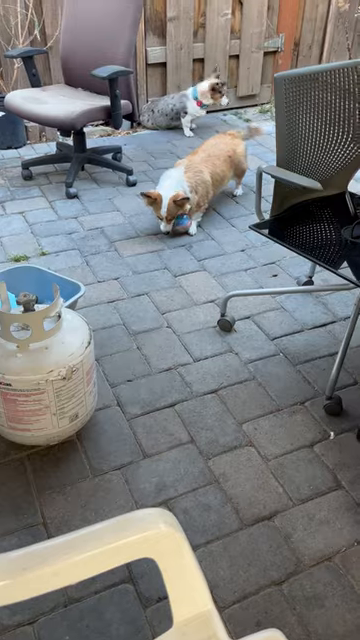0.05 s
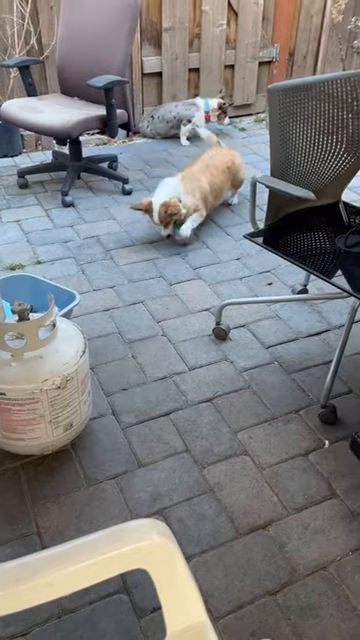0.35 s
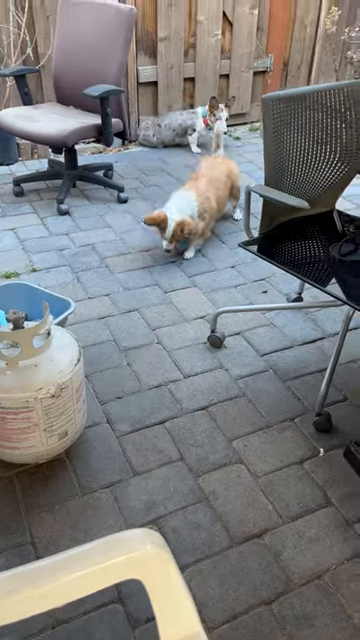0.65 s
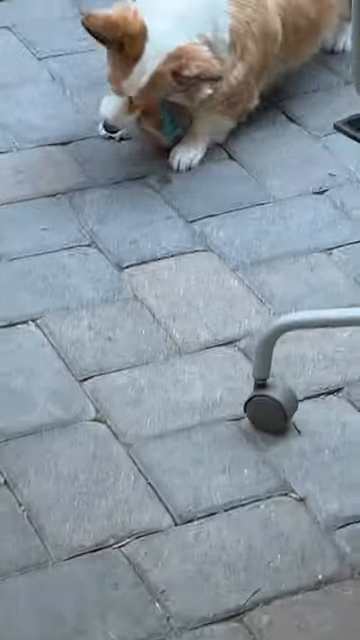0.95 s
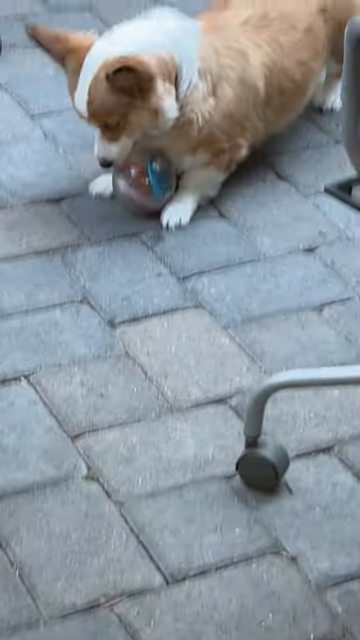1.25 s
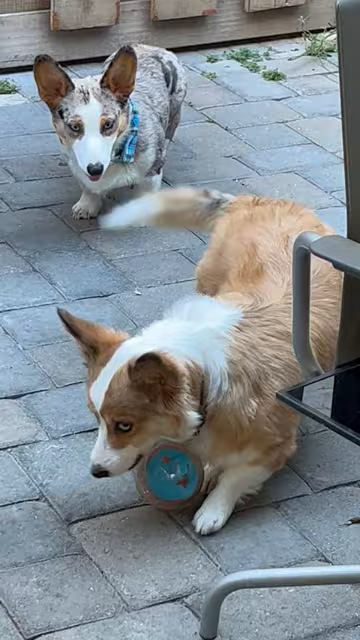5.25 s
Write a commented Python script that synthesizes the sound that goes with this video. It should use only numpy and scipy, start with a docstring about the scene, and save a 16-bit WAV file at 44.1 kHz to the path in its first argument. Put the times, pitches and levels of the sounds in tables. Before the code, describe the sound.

A dog plays with a hard hollow plastic ball on concrete pavers in a backyard, heard from nearby. In the first 0.6 seconds the ball knocks sharply and metal collar tags clink. From 0.7 to 2 seconds it is quieter, with only paws brushing the stone and claws ticking. Between 2.1 and 4.8 seconds the ball rolls, rattles and skids on grit in irregular pushes, with hollow knocks that are hardest around 2.4, 3.2 and 3.5 seconds. Lighter knocks and tag jingles follow from 5.4 to 6.6 seconds, then a soft, dull bump at 6.7. From 7.1 to 7.9 seconds a last shove brings scraping, hard knocks and more clinking tags. The sounds bounce briefly off the chairs, fence and house wall. A faint distant rumble, a wavering low hum and soft outdoor air continue throughout.

```python
"""A dog shoves a hard hollow plastic ball over concrete pavers; rumble, hum and outdoor air throughout.
0-0.6 s: the ball knocks (shell, enclosed air, contact crack) and metal collar tags clink.
0.7-2 s: paws brush the stone, claws tick. 2.1-4.8 s: the ball rolls, skids on grit and knocks hard.
5.4-6.6 s: lighter knocks and jingles. 6.7 s: a dull bump. 7.1-7.9 s: a last shove, hard knocks, tags.
Chairs, fence and house wall answer the dog and the ball briefly."""
import sys
import numpy as np
from scipy import signal
from scipy.fft import rfft, irfft, next_fast_len
from scipy.io import wavfile
from scipy.ndimage import uniform_filter1d, map_coordinates

SR = 44100
rng = np.random.default_rng(int(sys.argv[2]) if len(sys.argv) > 2 else 0)


def pcm_store(signal):
    """Save signal as 16-bit PCM."""
    levels = np.round(np.clip(np.atleast_2d(signal), -1, 1) * 32767)
    wavfile.write(sys.argv[1], SR, levels.astype(np.int16).T)


N = 349713
CLOCK_S = np.arange(N) / SR
EVENT_S = np.arange(SR // 2) / SR

# background (time [s], hum level [dB], air level [dB])
BACKGROUND_LEVELS = [(0, -61, -54.5), (1.8, -58.5, -56), (4.6, -48, -59), (6.101, -59.5, -53),
                     (7.93, -51, -53)]
# background spectra (frequency [Hz], relative density [dB])
RUMBLE_SPECTRUM = [(20, -34), (48, -4), (110, -1), (150, -8), (260, -8.5), (400, -64)]
AIR_SPECTRUM = [(120, -12.5), (230, -0.5), (400, -3), (700, -8.5), (1500, -13), (3000, -26), (6000, -37.5),
                (10000, -53.5)]
# fence and wall decay (frequency [Hz], t60 [s])
FENCE_DECAY = [(150, 0.88), (400, 0.18), (1000, 0.3), (3000, 0.11), (7000, 0.1), (15000, 0.27)]
# diffuse width (frequency [Hz], side gain [ratio])
DIFFUSE_WIDTH = [(60, .06), (130, .06), (250, .13), (550, .6), (1200, 1), (1600, .6), (2100, .3),
                 (3800, .28), (5200, .55), (12000, .65)]
# left over right (frequency [Hz], phase lead [rad])
LEFT_LEAD = [(500, 0), (1120, -.3), (1350, -1.1), (1640, 0), (4600, 0), (5400, -1.1), (9000, -1.25),
             (15000, -1.6)]
# left over right (frequency [Hz], gain [dB])
LEFT_GAIN = [(100, .2), (300, 1.3), (600, 3.3), (1100, 0)]

# contact spectra (frequency [Hz], relative density [dB])
PAW_SPECTRUM = [(1500, 0), (3500, -6.5), (7000, -1), (10000, -8.5), (13000, -5.5), (16000, -11)]
CLAW_SPECTRUM = [(800, -18), (2500, -19.5), (4800, 8), (6500, 12), (9000, 2), (12000, -36.5)]
COLLAR_SPECTRUM = [(1100, -26), (1800, -9), (2800, -19), (4100, -5), (4550, 0), (4950, -3), (6300, -6.5),
                   (11000, -40)]
GRIT_SPECTRUM = [(600, -31), (1500, 15.5), (2600, 5.5), (4800, 6.5), (7000, 5), (10000, -5.5), (13000, -9),
                 (16000, -20)]
THOCK_SPECTRUM = [(100, -38.5), (220, 8), (480, 9.5), (1150, 4.5), (1700, -2.5), (3000, -21.5), (6000, -43),
                  (11000, -68.5)]
SNAP_SPECTRUM = [(600, -13), (1400, -5), (2000, -3.5), (3000, -5.5), (4200, -13.5), (8000, -35)]
CRACK_SPECTRUM = [(1500, -19), (3200, -7.5), (4600, 2.5), (6400, 1), (8200, -5.5), (11000, -33.5)]
SIZZLE_SPECTRUM = [(5000, -32.5), (8500, 0.5), (10000, -3.5), (12500, 1.5), (15500, -8)]
# modes of tag, enclosed air and shell (frequency [Hz], relative level [dB], t60 [s])
LARGE_TAG_MODES = [(4250, -11, .18), (4520, 0, .24), (4620, -4, .2), (4800, -9, .18), (5630, -13, .16)]
CAVITY_MODES = [(292, -11, 0.06), (342, -3, 0.075), (410, -12, 0.04)]
LOW_SHELL_MODES = [(455, 0, .085), (532, 1, .085), (638, -1, .05), (795, -4, .07), (920, -3, .07),
                   (1060, -1, .065), (1270, -4, .09)]
STIFF_SHELL_MODES = [(1300, -2.5, .09), (1640, -2, .06), (1954, -1.5, .04), (2300, -2, .045),
                     (2785, -3, .055), (3400, -4, .04)]

# paws and claws on stone (time [s], level [dB])
PAW_SCUFFS = [(0.298, -55), (0.768, -52), (1.018, -57), (1.385, -57), (1.574, -54), (1.869, -53.5),
              (2.992, -43.5), (3.178, -41), (4.006, -51), (5.069, -61.5), (5.96, -48.5), (6.375, -56),
              (7.24, -36), (7.664, -46.5)]
CLAW_TICKS = [(0.8156, -48), (1.8295, -54.5), (2.1919, -46), (3.0, -32), (3.289, -48), (3.6245, -43.5),
              (4.3556, -46), (5.788, -31), (6.495, -56), (7.0887, -51), (7.265, -35.5), (7.6976, -45.5)]
# collar parts collide (time [s], strength [dB], favoured pitch [Hz])
COLLAR_JINGLES = [(0.382, -23.5, 4500), (0.463, -33.5, 4560), (0.5, -31, 4500), (0.574, -41.5, 4420),
                  (0.612, -37, 5360), (2.826, -44, 4000), (3.901, -43, 5360), (3.965, -48, 5100),
                  (4.293, -45, 5400), (4.399, -46, 4000), (5.681, -45, 4530), (5.919, -35, 5570),
                  (6.129, -38, 4270), (6.159, -37, 5440), (6.335, -44, 4000), (6.433, -46, 5500),
                  (6.547, -34.5, 5660), (7.224, -37, 4600), (7.267, -26, 4700), (7.701, -36, 4800)]
# large tag struck full on (time [s], level [dB])
TAG_CLINKS = [(0.384, -27.5), (0.4, -28), (0.454, -46)]
# thin tag (time [s], pitch [Hz], level [dB])
TAG_PINGS = [(2.422, 11600, -47), (7.528, 11860, -27), (7.529, 15150, -35), (7.75, 10400, -43)]
# dog pushes ball (peak time [s], swell [s], ebb [s], strength [dB], slip [0 roll, 1 skid], cavity [dB])
BALL_PUSHES = [(0.059, 0.052, 0.089, -43, 0.38, -42), (0.482, .11, .055, -33, 0.79, -39),
               (2.21, 0.157, 0.12, -56.5, 0.9, -47), (2.508, 0.06, 0.18, -47.5, 0.64, -38),
               (2.763, 0.051, .05, -51, 0.43, -38.5), (2.882, 0.055, 0.1, -46, 0.68, -39.5),
               (3.151, 0.08, 0.16, -41, 0.77, -35), (3.24, .05, .04, -49.5, 0.77, -49),
               (3.64, 0.25, 0.1, -42.5, 0.82, -46), (4.43, 0.068, 0.13, -53.5, 0.76, -45.5),
               (4.525, 0.21, 0.16, -42.5, 0.73, -39.5), (5.787, 0.056, 0.18, -47, 0.72, -40.5),
               (6.07, 0.039, 0.115, -39, 0.073, -40.5), (6.385, 0.078, 0.1, -54, 0.81, -63),
               (7.14, 0.083, 0.11, -49.5, 0.43, -59), (7.3, 0.15, 0.19, -37, 0.67, -40.5),
               (7.491, 0.044, 0.088, -36, 0.41, -38), (7.681, 0.092, 0.14, -56, 0.91, -60)]
# ball hits pavers (time [s], strength [dB], hardness [0-1], favoured pitch [Hz], cavity [dB])
BALL_KNOCKS = [(.029, -31.5, 0.1, 1060, -48), (0.3815, -9, 0.8, 1280, -18), (.468, -25, .3, 1080, -42),
               (.493, -28, 0.5, 1200, -28.5), (.514, -33.5, .3, 550, -43), (0.61, -37, 0.55, 1820, -41.5),
               (2.148, -33, 0.15, 1023, -38.5), (2.4212, -14.5, 0.45, 1090, -34),
               (2.597, -29.5, 0.77, 1150, -58), (2.613, -22, 0.5, 1150, -36),
               (2.849, -24.5, 0.5, 406, -36.5), (3.0, -32, 0.8, 1560, -39), (3.059, -24, .15, 477, -33),
               (3.07, -20, 0.72, 1660, -31.5), (3.1874, -14.5, 0.84, 1440, -24.5),
               (3.229, -30, 0.5, 5600, -31.5), (3.343, -32, .6, 1100, -42.5), (3.471, -25, 0.2, 300, -33),
               (3.514, -11.5, 0.83, 4600, -25), (3.527, -13, 0.92, 597, -22.5),
               (3.74, -33, 0.3, 684, -33.5), (3.83, -33.5, 0.2, 526, -48), (4.185, -33, 0.3, 340, -32.5),
               (4.511, -26, 0.68, 1100, -33), (4.815, -20, 0.48, 880, -29.5), (5.446, -22, .15, 600, -34),
               (5.555, -35.5, 0, 558, -42), (5.692, -23, 0.1, 680, -32), (5.792, -26.5, 0.08, 550, -36),
               (5.86, -25, 0.6, 1500, -49), (5.991, -23, 0.7, 1660, -36.5), (6.021, -18, 0, 520, -38),
               (6.904, -31, 0.24, 950, -43), (7.266, -25.5, 0.8, 4730, -31), (7.344, -22.5, .2, 560, -38),
               (7.405, -21.5, 0.6, 1920, -36.5), (7.432, -9.5, 0.58, 1230, -33),
               (7.525, -17.5, 0.86, 1120, -38), (7.732, -20, .6, 716, -31), (7.851, -15, 0.79, 1950, -31)]

# layer laws (gain at full hardness or slip [dB], loss at zero [dB])
CLACK_LAW_DB, CRACK_LAW_DB, SIZZLE_LAW_DB = (-6, 25), (-5, 30.3), (-7.5, 40.2)
RATTLE_LAW_DB, GRIT_LAW_DB = (3.5, 4.9), (8.6, 34)
RUMBLE_DB, CHAIRS_DB, FENCE_DB = -51, -13, -9.5
BUMP_TIME_S, BUMP_HALF_WIDTH_S, BUMP_DB = 6.7, 0.066, -44.5
TOP_HZ = 16000


def amp(db):
    """Decibels to gain."""
    return 10 ** (np.asarray(db) / 20)


def unit(x):
    """Scale to rms 1."""
    return x / np.sqrt(np.mean(x ** 2) + 1e-20)


def unit_onset(x):
    """Scale to rms 1 over the first 10 ms."""
    return x / np.sqrt(np.mean(x[:SR // 100] ** 2) + 1e-20)


def decay(t60_s, time_s=EVENT_S):
    """Exponential decay."""
    return np.exp(-np.log(1000) * time_s / t60_s)


def curve_at(points, hz):
    """Interpolate on a log frequency axis."""
    knots_hz, values = np.transpose(points)
    return np.interp(np.log(hz + 1), np.log(knots_hz), values)


def wobble(rate_hz, time_s=CLOCK_S):
    """Smooth random curve."""
    knots = rng.standard_normal(int(time_s[-1] * rate_hz) + 4)
    return map_coordinates(knots, [time_s * rate_hz])


def filtered(x, response):
    """Apply a frequency response."""
    size = next_fast_len(N + SR // 2)
    return irfft(rfft(x, size) * response(np.fft.rfftfreq(size, 1 / SR)), size)[..., :N]


def noise(spectrum):
    """Coloured noise, rms 1."""
    return unit(filtered(rng.standard_normal(N), lambda hz: amp(curve_at(spectrum, hz))))


def min_phase(spectrum, size=1024):
    """Minimum-phase impulse response."""
    gain = amp(curve_at(spectrum, np.fft.rfftfreq(size, 1 / SR)))
    cepstrum = irfft(np.log(gain))
    cepstrum[1:size // 2] *= 2
    cepstrum[size // 2 + 1:] = 0
    return irfft(np.exp(rfft(cepstrum)))


def add(track, at_s, sound):
    """Mix in place."""
    part = track[max(round(at_s * SR), 0):][:len(sound)]
    part += sound[:len(part)]


def diffuse(mid, side):
    """Stereo from all around; bass nearly mono."""
    side = filtered(side, lambda hz: curve_at(DIFFUSE_WIDTH, hz))
    return np.array([mid + side, mid - side])


def layer_gain(law_db, control):
    """Gain falling as control goes from 1 to 0."""
    top_db, loss_db = law_db
    return amp(top_db - loss_db * (1 - control))


def ring(modes, scatter_db, detune, attack_s):
    """Damped modes; level and pitch vary with the contact point."""
    hz, db, t60_s = np.transpose(modes)[:, :, None]
    size, shift, phase = rng.standard_normal((3, len(modes), 1))
    waves = np.sin(2 * np.pi * (hz * (1 + detune * shift) * EVENT_S + phase)) * decay(t60_s)
    onset = 1 - np.exp(-EVENT_S / attack_s)
    return unit_onset((amp(db + scatter_db * size) * waves).sum(0) * onset)


def burst(colour_ir, snap_t60_s, chatter_db, chatter_t60_s):
    """Sharp contact, then uneven chatter."""
    size = len(EVENT_S)
    chatter = rng.standard_normal(size)
    chatter *= np.repeat(amp(1.1 * rng.standard_normal(size)), SR // 700)[:size]
    snap = rng.standard_normal(size) * decay(snap_t60_s)
    force = snap + amp(chatter_db) * chatter * decay(chatter_t60_s)
    return unit_onset(signal.fftconvolve(force, colour_ir)[:size])


def impacts(rate_hz, spread_db):
    """Random tiny impulses."""
    hits = rng.random(N) < rate_hz / SR
    return hits * rng.choice([-1, 1], N) * amp(spread_db * rng.uniform(-1, 1, N))


def contact_point(favoured_hz, lift_db=5, width_oct=0.62, uneven_db=2):
    """A contact point favours modes near one pitch and leaves the rest uneven."""
    hz = np.geomspace(200, TOP_HZ, 56)
    peak_db = lift_db * np.exp(-(np.log2(hz / favoured_hz) / width_oct) ** 2)
    return min_phase(np.c_[hz, peak_db + uneven_db * rng.standard_normal(len(hz))])


def wander(x, rate_hz, depth=0.045):
    """Pitch strays as the ball turns."""
    return map_coordinates(x, [SR * (CLOCK_S + depth / rate_hz * wobble(rate_hz))], mode="mirror")


def patchy(x, depth_db=3.5):
    """Each sand chip has its own colour: short spectral patches rise and dip."""
    bins = signal.stft(x, nperseg=256)[2]
    patches = uniform_filter1d(rng.standard_normal(bins.shape), size=3, axis=0)
    patches = unit(uniform_filter1d(patches, size=5, axis=1))
    return unit(signal.istft(bins * amp(depth_db * patches), nperseg=256)[1][:N])


def background(hum_hz=79):
    """Distant rumble, wavering hum, soft outdoor air; a dull low thump swells briefly at 6.7 s."""
    times_s, *levels_db = np.transpose(BACKGROUND_LEVELS)
    hum_db, air_db = [np.interp(CLOCK_S, times_s, column) for column in levels_db]
    bump = amp(BUMP_DB) * np.exp(-((CLOCK_S - BUMP_TIME_S) / BUMP_HALF_WIDTH_S) ** 2)
    rumble = (amp(RUMBLE_DB) + bump) * diffuse(noise(RUMBLE_SPECTRUM), noise(RUMBLE_SPECTRUM))
    hum = amp(hum_db + 1.5 * wobble(2.8)) * np.sin(2 * np.pi * hum_hz * CLOCK_S + 0.46 * wobble(9))
    air = amp(air_db + 1.6 * wobble(3)) * diffuse(noise(AIR_SPECTRUM), noise(AIR_SPECTRUM))
    return rumble + hum + air


def fence(x, build_s=0.0084):
    """Short diffuse tail off fence and house wall, redrawn every 1/3 s for the moving ball."""
    mid_side = np.zeros((2, N))
    hop = SR // 3
    for start in range(0, N, hop):
        hz, frames_s, bins = signal.stft(rng.standard_normal((2, len(EVENT_S))), SR, nperseg=256)
        bins *= decay(curve_at(FENCE_DECAY, hz)[:, None], frames_s)
        tails = signal.istft(bins, SR, nperseg=256)[1][:, :len(EVENT_S)]
        tails *= 1 - np.exp(-EVENT_S / build_s)
        for track, tail in zip(mid_side, tails):
            add(track, start / SR, signal.fftconvolve(x[start:start + hop], tail / np.linalg.norm(tail)))
    return diffuse(*mid_side)


def chairs(x):
    """Early reflections off nearby chairs arrive sideways."""
    echoes = rng.standard_normal(len(EVENT_S)) * decay(t60_s=0.064)
    return diffuse(0, signal.fftconvolve(x, echoes / np.linalg.norm(echoes))[:N])


def paws(rise_s=0.018, fall_s=0.035, rustle_s=0.09):
    """Pads slide over stone; a soft rustle surrounds the quieter strokes."""
    strokes, rustle = np.zeros((2, N))
    for at_s, db in PAW_SCUFFS:
        age_s = CLOCK_S - at_s
        strokes += amp(db) * np.exp(-(age_s / np.where(age_s < 0, rise_s, fall_s)) ** 2)
        if db < -45:
            rustle += amp(db - 15) * np.exp(-np.abs(age_s) / rustle_s)
    return np.hypot(strokes, rustle) * amp(1.1 * wobble(120) - 0.5) * patchy(noise(PAW_SPECTRUM))


def claws():
    """Claws click on stone; loose grit sizzles."""
    out = np.zeros(N)
    click_ir, sizzle_ir = min_phase(CLAW_SPECTRUM), min_phase(SIZZLE_SPECTRUM)
    for at_s, db in CLAW_TICKS:
        click = burst(click_ir, snap_t60_s=0.0044, chatter_db=-9, chatter_t60_s=0.17)
        sizzle = burst(sizzle_ir, snap_t60_s=0.009, chatter_db=-11, chatter_t60_s=0.13)
        add(out, at_s, amp(db) * (click + amp(-1.5) * sizzle))
    return out


def collar_tags():
    """Metal parts click, rebound and ring the large tag; a thin tag pings, buzzing on its ring."""
    out = np.zeros(N)
    collar_ir = min_phase(COLLAR_SPECTRUM)
    for at_s, db, hz in COLLAR_JINGLES:
        colour_ir = np.convolve(collar_ir, contact_point(hz))
        click = burst(colour_ir, snap_t60_s=0.009, chatter_db=-18, chatter_t60_s=0.25)
        contacts = amp(-12) * impacts(rate_hz=35, spread_db=6.5)[:len(EVENT_S)] * decay(t60_s=0.45)
        contacts[0] = 1  # first hit; the rest are rebounds
        clicks = signal.fftconvolve(contacts, click)[:len(EVENT_S)]
        tag = amp(-13) * ring(LARGE_TAG_MODES, scatter_db=1, detune=0.004, attack_s=0.0003)
        add(out, at_s, amp(db - 7.5) * (clicks + tag))
    for at_s, db in TAG_CLINKS:
        add(out, at_s, amp(db) * ring(LARGE_TAG_MODES, scatter_db=-0.5, detune=0.0034, attack_s=0.0003))
    for at_s, hz, db in TAG_PINGS:
        buzz_rad = 0.8 * wobble(250, EVENT_S)
        add(out, at_s, amp(db) * np.sin(2 * np.pi * hz * EVENT_S + buzz_rad) * decay(t60_s=0.09))
    return out


def ball_rolling():
    """Rough concrete drums on the ball: the cavity hums; skids rattle the shell and crackle grit."""
    gains = np.zeros((3, N))
    for peak_s, swell_s, ebb_s, db, slip, cavity_db in BALL_PUSHES:
        near = np.abs(CLOCK_S - peak_s) < 2 * max(swell_s, ebb_s)
        age_s = CLOCK_S[near] - peak_s
        push = amp(-20 * np.maximum(-age_s / swell_s, age_s / ebb_s) ** 1.25)
        shell_gain = amp(db) * layer_gain(RATTLE_LAW_DB, slip)
        grit_gain = amp(db) * layer_gain(GRIT_LAW_DB, slip)
        gains[:, near] += np.outer([amp(cavity_db), shell_gain, grit_gain], push)
    excite = lambda force, body_ir: unit(signal.fftconvolve(force, body_ir)[:N])
    bumps = impacts(rate_hz=2500, spread_db=9)
    sand = impacts(rate_hz=5000, spread_db=14)
    cavity_ir = ring(CAVITY_MODES, scatter_db=1, detune=0, attack_s=0.001)
    cavity = wander(excite(bumps, cavity_ir), rate_hz=22)
    shell_ir = ring(LOW_SHELL_MODES, scatter_db=1.5, detune=0, attack_s=0.0004)
    shell = amp(-2) * wander(excite(bumps, shell_ir), rate_hz=17)
    shell += amp(-2.5) * patchy(excite(bumps, min_phase(THOCK_SPECTRUM)))
    grit = patchy(excite(bumps + sand, min_phase(GRIT_SPECTRUM)))
    pressure = amp(1.3 * wobble(70))  # ball skips and catches
    return pressure * (gains * [cavity, shell, grit]).sum(0)


def ball_knocks():
    """Blows ring the shell and enclosed air; harder contacts add clack, crack and sizzle."""
    out = np.zeros(N)
    thock_ir, snap_ir = min_phase(THOCK_SPECTRUM), min_phase(SNAP_SPECTRUM)
    crack_ir, sizzle_ir = min_phase(CRACK_SPECTRUM), min_phase(SIZZLE_SPECTRUM)
    for at_s, db, hardness, hz, cavity_db in BALL_KNOCKS:
        shell = amp(-4.5) * ring(LOW_SHELL_MODES, scatter_db=3.3, detune=0.028, attack_s=0.0016)
        shell += amp(-0.5) * burst(thock_ir, snap_t60_s=0.013, chatter_db=-12, chatter_t60_s=0.2)
        clack = amp(-4) * ring(STIFF_SHELL_MODES, scatter_db=4.5, detune=0.018, attack_s=0.00015)
        clack += amp(-2.5) * burst(snap_ir, snap_t60_s=0.006, chatter_db=-13.5, chatter_t60_s=0.22)
        crack = burst(crack_ir, snap_t60_s=0.007, chatter_db=-13, chatter_t60_s=0.23)
        sizzle = burst(sizzle_ir, snap_t60_s=0.013, chatter_db=-13, chatter_t60_s=0.12)
        cavity = ring(CAVITY_MODES, scatter_db=3, detune=0.035, attack_s=0.005)
        blow = amp(-12) * shell + layer_gain(CLACK_LAW_DB, hardness) * clack
        blow += layer_gain(CRACK_LAW_DB, hardness) * crack + layer_gain(SIZZLE_LAW_DB, hardness) * sizzle
        blow = signal.fftconvolve(blow, contact_point(hz))[:len(EVENT_S)]
        add(out, at_s, amp(db) * blow + amp(cavity_db) * cavity)
    return out


def scene():
    """Ball and dog slightly off centre, with reflections, over the background."""
    direct = ball_knocks() + claws() + paws() + collar_tags() + ball_rolling()
    in_yard = direct + amp(CHAIRS_DB) * chairs(direct) + amp(FENCE_DB) * fence(direct)
    sides = np.array([[0.5], [-0.5]])
    pan = lambda hz: amp(sides * curve_at(LEFT_GAIN, hz)) * np.exp(1j * sides * curve_at(LEFT_LEAD, hz))
    return filtered(in_yard, pan) + background()


def record(dry):
    """Steep low-pass at TOP_HZ."""
    return filtered(dry, lambda hz: 1 / (1 + (hz / TOP_HZ) ** 100))


dry = scene()
out = record(dry)
pcm_store(out)
```